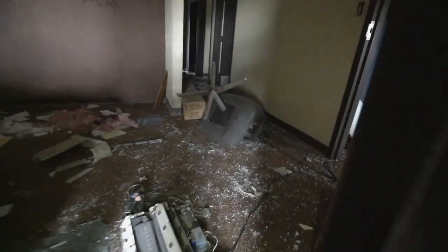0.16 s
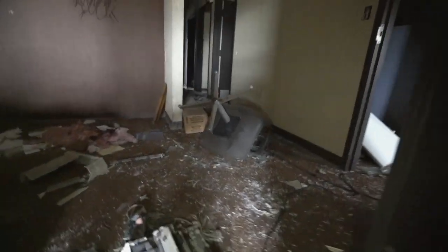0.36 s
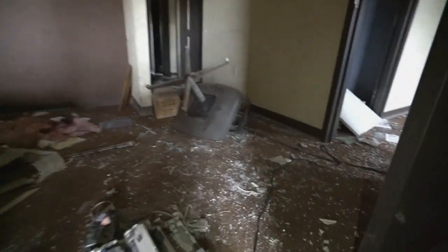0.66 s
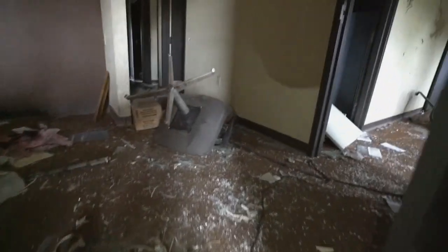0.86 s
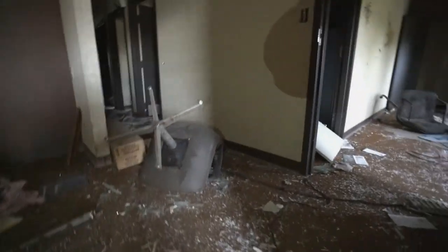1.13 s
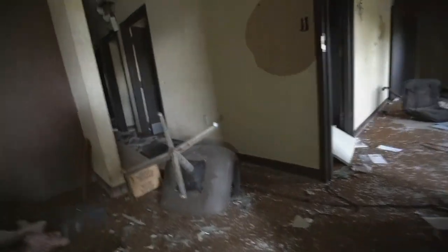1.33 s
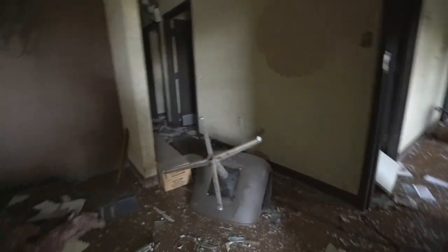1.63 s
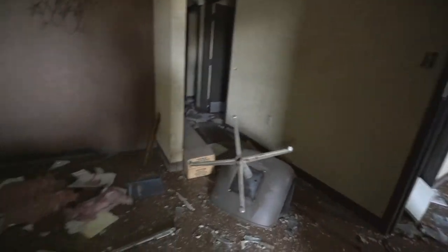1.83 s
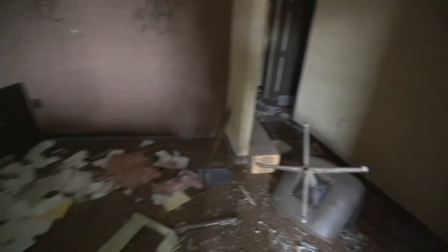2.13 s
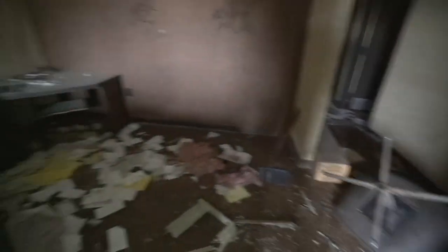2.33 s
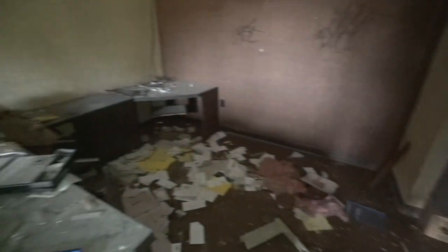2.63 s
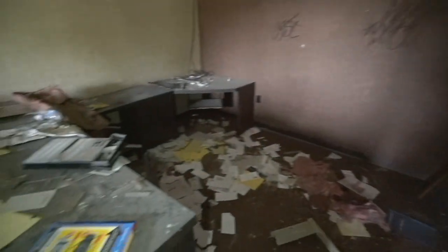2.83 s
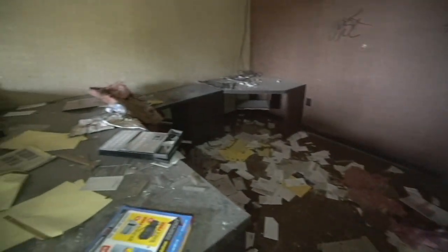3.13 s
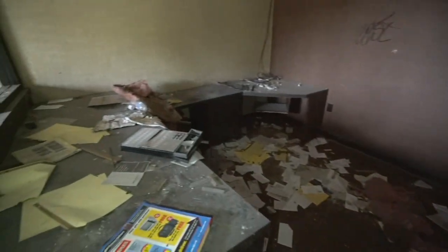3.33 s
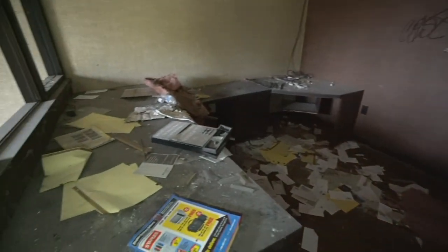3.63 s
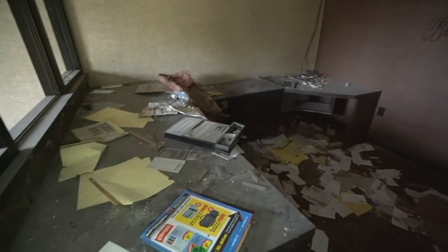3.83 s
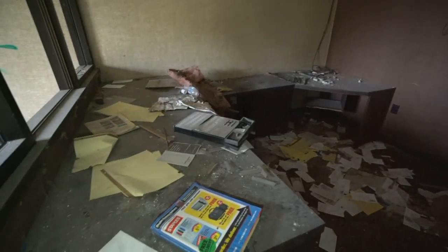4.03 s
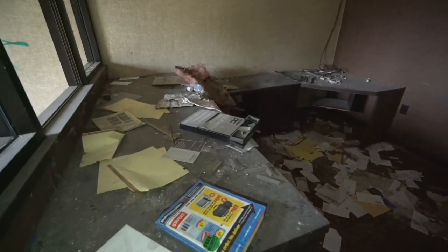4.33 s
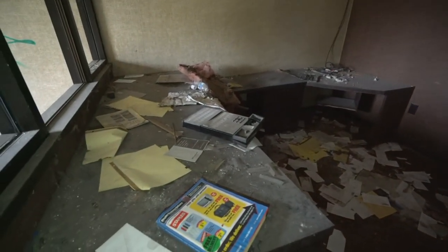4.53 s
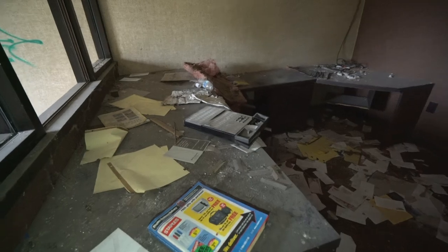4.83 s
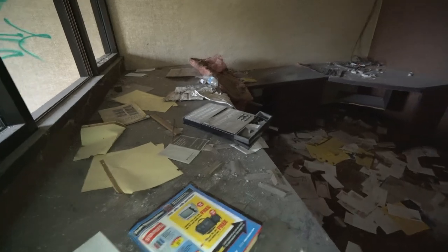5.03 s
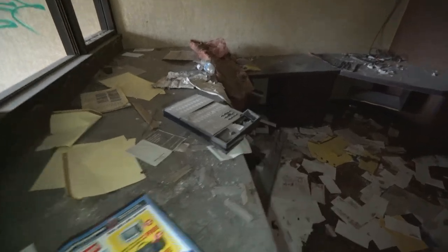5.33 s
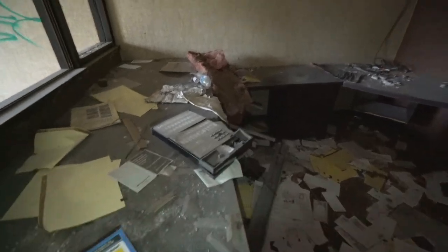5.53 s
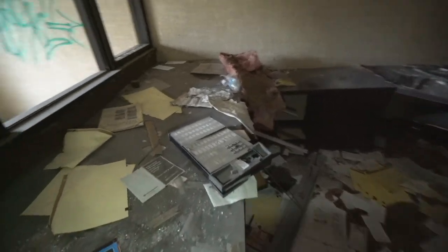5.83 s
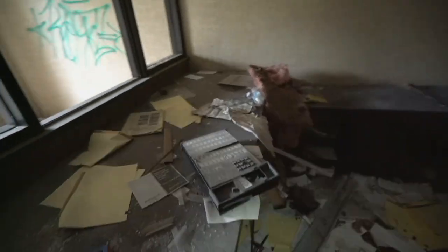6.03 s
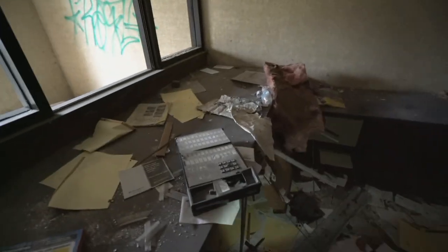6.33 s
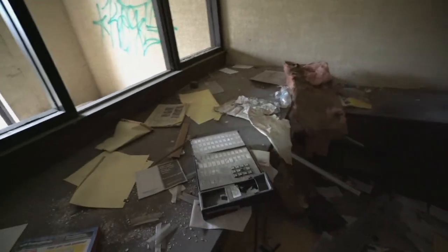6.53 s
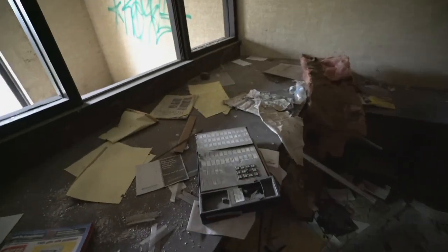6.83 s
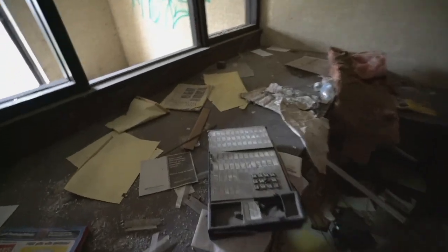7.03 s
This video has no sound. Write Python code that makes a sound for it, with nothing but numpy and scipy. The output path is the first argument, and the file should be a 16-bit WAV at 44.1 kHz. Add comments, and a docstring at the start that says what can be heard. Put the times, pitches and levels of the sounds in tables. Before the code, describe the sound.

In a small bare room, someone treads slowly over glass, each step grinding grit, cracking shards and knocking loose pieces that clink. After a pause holding a few hollow knocks, a single step crunches again, and soles slide softly on paper among tiny dry ticks near the microphone. The steps echo briefly off the walls, over a faint hush and light puffs of air on the moving microphone.

```python
"""Broken glass snaps and grinds under slow footsteps in a small bare room.
Each tread crushes grit and breaks shards; heels knock on debris, pieces clink, soles slide on paper.
After a pause with a few hollow knocks come one more crunching step, tiny close ticks and a shuffle.
Walls and ceiling throw it all back. Underneath: air on the carried microphone and the room's hush."""
import sys
import numpy as np
from scipy import signal
from scipy.fft import rfft, irfft
from scipy.io import wavfile
from scipy.ndimage import uniform_filter1d

SR = 44100
rng = np.random.default_rng(int(sys.argv[2]) if len(sys.argv) > 2 else 0)


def transcribe(u):
    """Save the signal u as a 16-bit wav file named by the first command-line argument.

    u: samples, shape (n,) or (channels, n), limited to [-1, 1]; the rate is SR.
    q: integer samples, one column per channel.
    """
    v = np.clip(np.atleast_2d(u).T, -1, 1)
    q = np.round(v * 32767).astype(np.int16)
    wavfile.write(sys.argv[1], SR, q)


N = 316638
TAPS = 2048
CLICK_HZ, CLICK_S = np.fft.rfftfreq(TAPS, 1 / SR), np.arange(TAPS) / SR
PORT_GAP_S = 0.000371  # travel time between the two microphone ports

# shard spectrum: freq_hz, density_db
SHARD_SPECTRUM = [(80, -43), (300, -7.5), (1000, -4), (2500, 3), (5500, 0.5), (8000, 1), (11000, -1.5),
                  (16000, -20.5)]
# breaking shards: start_s, level_db, body_db, sparkle_db, room_db
SNAPS = [(0.0751, -25, 2.5, -10, 3.5), (0.1734, -31.5, -9, -6.5, 4), (0.2281, -28, -13.5, -5, 4.5),
         (0.2415, -24.5, -12, -15, -15), (0.2657, -27.5, -3, -1, 3.5), (0.2802, -30.5, -2, -5.5, 7.5),
         (0.432, -42.5, -8, -14, 9), (0.6619, -40, -9, -25, 4), (0.7333, -38, -16, -32, 3.5),
         (0.836, -27, 1.5, -11, 3), (0.8869, -29.5, -8.5, -23, 3.5), (0.9373, -30.5, -12, -20, 7),
         (1.0216, -31, -1, -24, -1), (1.132, -31, -2, -17, -14), (1.1744, -28.5, -5, -11, -11),
         (1.2467, -17.5, -2.5, -18, -5), (1.2613, -30, 11, -11, -3), (1.3018, -21, -23, -24, -2.5),
         (1.3294, -27.5, 18, -8, -8), (1.4219, -16.5, 8, -0.5, 2), (1.5424, -25, -11, -11, 3.5),
         (1.5545, -27.5, -28, -5, -8), (1.6287, -33, -11.5, -5, 0.5), (1.7449, -32.5, -10, -4, -2),
         (1.8164, -36, -22, -9, -17), (1.8349, -35, -10, 1, 4), (1.8439, -29.5, -1, -8, 0),
         (1.9009, -26, -9.5, -6.5, 0), (1.9525, -25.5, -16, -8, -7), (1.982, -25, -1, -4, 2),
         (2.0022, -20, -8.5, -13.5, 4.5), (2.0165, -34, -2, 2, 7), (2.499, -36, -8, -5.5, 5.5),
         (2.6094, -36, -6, -22, 9), (2.6441, -24.5, 1.5, -34, 2), (2.7714, -24, -2, -10, 1),
         (2.7829, -25.5, -11, -10.5, -7), (3.484, -39, 2, -21, 5.5), (3.558, -44.5, -2.5, -7, 7.5),
         (3.764, -44.5, -13, -5, 1), (3.7883, -46, -11, -6, -8), (3.8615, -54, -5, -11, 12),
         (4.1858, -50.5, 0, 1, 2), (4.1967, -42, -20, 3, -5), (4.9993, -31, -3.5, -5, 4),
         (5.0464, -25, -.5, -13, 5), (5.0587, -27, -6.5, -8, 5), (5.1345, -25.5, -0.5, -7, 5),
         (5.1477, -28, -9.5, -5, 6)]


def snaps(burst_s=0.0006, splinter_s=0.0062, splinter_db=-9, strain_s=0.0019, strain_db=-15, gain_db=18):
    """A shard crackles under strain, fails in a quick burst and sheds splinters."""
    out = np.zeros((2, N))
    for start_s, level_db, body_db, sparkle_db, room_db in SNAPS:
        tilt = [(1500, body_db + 8.5), (3400, 0), (6000, 0), (9000, sparkle_db)]
        colour = click(curve(SHARD_SPECTRUM, CLICK_HZ) + curve(tilt, CLICK_HZ))
        gain = amp(level_db + gain_db)
        crack = fractures(colour, burst_s) + amp(splinter_db) * fractures(colour, splinter_s)
        add(out, start_s, gain * in_room(crack, room_db, foot_pan_db(start_s), tail_input=colour))
        strain = np.array([fractures(colour, strain_s)[::-1] for port in range(2)])  # swells to the break
        add(out, start_s - TAPS / SR + burst_s, gain * amp(strain_db) * strain)
    return out


# grit, splinter and floor spectra: freq_hz, density_db
GRIT_SPECTRUM = [(880, -29), (1500, -2.5), (2320, -9), (2830, -9), (4730, -6.5), (5830, -3), (7690, -5),
                 (11200, -14.5), (14900, -21), (16000, -42)]
SPLINTER_SPECTRUM = [(800, -17), (2200, -17), (3600, 12.5), (5600, 10.5), (7500, -3.5), (11000, -23),
                     (16000, -15)]
MURMUR_SPECTRUM = [(80, -19.5), (200, -2.5), (340, -1), (600, 0.5), (1000, -1), (1600, -2.5), (2600, 1),
                   (6000, -27)]
# sole bearing down on glass: start_s, length_s, grind_db, murmur_db
TREADS = [(-.03, .2, -50.5, -47), (.23, 0.087, -49.5, -42.5), (.42, 0.087, -55, -58),
          (.58, 0.14, -52, -51.5), (.85, 0.22, -43.5, -47.5), (.98, 0.37, -41.5, -43.5),
          (1.57, 0.36, -51, -55.5), (1.85, .2, -44.5, -49), (2.13, 0.047, -50, -53),
          (2.27, 0.05, -47.5, -49), (2.43, 0.29, -50, -49), (3.5, 0.37, -64, -64), (4.945, 0.046, -50, -51),
          (5.0, .035, -47, -53), (5.05, 0.34, -47.5, -50), (5.69, 0.035, -53.5, -62.5),
          (5.86, 0.23, -60.5, -59.5)]


def grinding(full_load_db=-51.5):
    """Fine grit is crushed, splinters crackle under load, and the floor murmurs as the weight shifts."""
    weight, shift = envelopes(TREADS, rise_share=0.034, fall_db_per_s=72.5, build_db=2)
    load = np.minimum(weight / amp(full_load_db), 1) ** 2
    grit = weight * grains(GRIT_SPECTRUM, per_s=1300, spread_db=6.5, room_db=1.5)
    crackle = weight * load * grains(SPLINTER_SPECTRUM, per_s=260, spread_db=4.5, room_db=-6)
    murmur = shift * grains(MURMUR_SPECTRUM, per_s=800, spread_db=2.5, room_db=5.5)
    return grit + amp(-1.5) * crackle + amp(-2.5) * murmur


# litter clack spectrum: freq_hz, density_db
LITTER_SPECTRUM = [(150, -45), (450, -7.5), (760, 7), (930, 5), (1100, 1.5), (1500, -1.5), (2000, -3),
                   (2700, -8), (5000, -12), (12000, -25)]
# thud spectrum: pitch_ratio, density_db
THUD_SPECTRUM = [(.1, -54), (.3, -39), (.6, -8), (1, 6), (1.5, -9), (2.1, -8), (3.2, -29), (7, -40),
                 (20, -80)]
# heels and debris hitting the floor: start_s, level_db, pitch_hz, clack_db
KNOCKS = [(0.075, -21, 293, -13.5), (0.177, -33, 281, -22), (1.245, -29.5, 580, 1.5),
          (1.345, -28.5, 315, -14), (1.421, -16, 340, -33), (2.771, -12.5, 343, -12.5),
          (2.786, -32.5, 378, 8), (3.125, -28, 294, -9.5), (3.231, -37, 550, -5.5), (3.247, -32.5, 550, -9),
          (3.263, -30, 520, -8.5), (3.295, -27.5, 372, -11.5), (3.311, -39, 510, 0.5), (3.48, -29, 530, -7),
          (3.562, -43.5, 500, -3.5), (4.392, -54, 573, -10), (6.005, -42, 637, -20), (6.985, -33, 350, -17)]


def knocks(contact_s=0.0016, sink_s=0.00354, hollow_db=-11.5, hollow_t60_s=0.041, room_db=-6, gain_db=20):
    """Rough contact clacks on litter, the weight sinks in with a thud, the struck piece hums briefly."""
    out = np.zeros((2, N))
    litter = click(curve(LITTER_SPECTRUM, CLICK_HZ))
    pitch_ratio, density_db = np.transpose(THUD_SPECTRUM)
    for start_s, level_db, pitch_hz, clack_db in KNOCKS:
        gain = amp(level_db + gain_db)
        spectrum = amp(curve(np.c_[pitch_hz * pitch_ratio, density_db], CLICK_HZ))
        pulse = np.fft.fftshift(irfft(1j * spectrum))  # a push, then a pull
        thud = in_room(pulse / np.linalg.norm(pulse), room_db, pan_db=2, lag_s=0.000073)
        add(out, start_s + sink_s - TAPS / 2 / SR, gain * thud)
        hollow = ring([(pitch_hz, hollow_db, hollow_t60_s)], size=4096)
        add(out, start_s + sink_s, amp(level_db) * in_room(hollow, room_db, lag_s=0.0001))
        clack = in_room(fractures(litter, contact_s), room_db=2.5, tail_input=litter)
        add(out, start_s, gain * amp(clack_db) * clack)
    return out


# scrape, hiss and rub spectra: freq_hz, density_db
SCRAPE_SPECTRUM = [(300, -15), (450, -5.5), (600, -7.5), (780, -2.5), (1020, -1), (1260, -0.5), (1500, -2),
                   (1850, -4.5), (2200, -1.5), (2800, -29), (4500, -11), (9000, -33)]
HISS_SPECTRUM = [(1500, -5.5), (2800, 3.5), (5000, -2), (8000, -3), (12000, -10.5), (16000, -20)]
RUB_SPECTRUM = [(90, -16), (200, -11.5), (340, -2), (500, -5.5), (800, -12.5), (2000, -45)]
# sole sliding on paper and dust: start_s, length_s, scrape_db, hiss_db, rub_db
SLIDES = [(-.01, 0.014, -43.5, -41, -45), (2.35, 0.048, -51.5, -68, -50.5), (2.51, 0.1, -50.5, -46.5, -48),
          (2.635, 0.017, -43, -44, -43.5), (5.17, 0.076, -45.5, -45.5, -51.5),
          (5.3, 0.068, -44.5, -41, -57), (5.41, 0.065, -60, -64, -61), (5.555, 0.076, -58.5, -51.5, -68),
          (5.96, 0.12, -56.5, -57, -62.5), (6.07, 0.17, -64, -62, -62.5), (6.15, 0.098, -48.5, -50.5, -59),
          (6.92, 0.11, -49, -49.5, -54.5), (6.975, 0.038, -49, -45, -45), (7.0, 0.16, -54, -53.5, -53)]


def scuffing(slip_rms_db=1.5):
    """A sole catches and slips on paper: a jerky scrape, hiss above, a soft rub below."""
    scrape_gain, hiss_gain, rub_gain = envelopes(SLIDES, rise_share=0.24, fall_db_per_s=250, build_db=1.5)
    slip_db = slip_rms_db * unit_rms(uniform_filter1d(rng.standard_normal(N), size=400))
    scrape = scrape_gain * grains(SCRAPE_SPECTRUM, per_s=700, spread_db=2, room_db=0.5)
    hiss = hiss_gain * grains(HISS_SPECTRUM, per_s=2800, spread_db=14, room_db=11)
    rub = rub_gain * grains(RUB_SPECTRUM, per_s=700, spread_db=4, room_db=2.5)
    return amp(slip_db + 1) * scrape + amp(-0.5) * hiss + amp(slip_db / 2 - 0.5) * rub


# modes of a loose piece: pitch_ratio, level_db, t60_cycles
PIECE_MODES = [(1.001, 1.5, 48), (1.08, -14, 21), (1.27, -9, 40), (2.66, -32, 70)]
# clinking pieces: start_s, level_db, pitch_hz
CLINKS = [(0.075, -28.5, 1085), (0.733, -32.5, 3080), (0.972, -25, 1130), (1.423, -24, 3510),
          (1.437, -44, 1520), (2.658, -23, 3070), (2.786, -26, 1950), (5.048, -28, 2267),
          (5.061, -30.5, 1605), (5.232, -37, 1114), (5.393, -38.5, 1184), (5.977, -46, 1060),
          (6.986, -36.5, 1003), (7.024, -39, 1030)]


def clinks():
    """Loose pieces ring as they are pressed down."""
    out = np.zeros((2, N))
    for start_s, level_db, pitch_hz in CLINKS:
        modes = [(pitch_hz * ratio, db, cycles / pitch_hz / ratio) for ratio, db, cycles in PIECE_MODES]
        add(out, start_s, amp(level_db) * in_room(ring(modes, size=4096), room_db=0.5, lag_s=0.0001))
    return out


# small metal modes: freq_hz, level_db, t60_s
METAL_MODES = [(10210, -19, .1), (10600, -6, 0.15), (11940, -7, 0.21), (11070, 5.5, 0.21),
               (11400, -12, .14), (11370, -9, .12), (11800, -13, .1), (13330, -10, 0.088)]
# jingles: start_s, level_db
JINGLES = [(1.422, -38.5), (2.774, -52)]


def jingles():
    """Small metal rings at the heaviest steps."""
    out = np.zeros((2, N))
    for start_s, level_db in JINGLES:
        metal = ring(METAL_MODES, size=12000)
        add(out, start_s, amp(level_db) * in_room(metal, room_db=-28.5, lag_s=0.00001))
    return out


# tick modes: freq_hz, level_db, t60_s
TICK_MODES = [(5040, -3.5, 0.0048), (6050, 6, 0.0023), (6640, 1.5, 0.005), (10300, -12, 0.005),
              (12920, -13, .003)]
# close ticks: start_s, level_db
TICKS = [(5.441, -31), (5.4485, -20), (5.4524, -20.5), (5.5365, -35), (5.5405, -25.5), (5.661, -24),
         (5.9113, -29)]


def ticks(rise_s=0.00022):
    """Tiny dry ticks beside the microphone ring for a few milliseconds."""
    out = np.zeros((2, N))
    attack = (1 - np.exp(-CLICK_S / rise_s)) ** 2
    for start_s, level_db in TICKS:
        tick = amp(level_db) * attack * ring(TICK_MODES, detune=0.036)
        add(out, start_s - PORT_GAP_S, in_room(tick, room_db=-36, pan_db=7, lag_s=0.00004))
    return out


# wind spectrum: freq_hz, density_db
WIND_SPECTRUM = [(15, -8.5), (40, -4.5), (70, 4), (110, -1), (180, -6.5), (400, -32)]
# puffs of air: start_s, length_s, level_db
GUSTS = [(.05, 0.035, -44.5), (1.04, 0.21, -41.5), (1.3, 0.14, -51), (1.51, 0.014, -45.5),
         (3.26, 0.039, -56), (6.23, 0.021, -58)]


def wind(draught_db=-60.5, ease_db_per_s=0.37, eddy_db=-16, gain_db=-3.5):
    """Air buffets the moving microphone and eddies between its ports; the draught slowly eases."""
    buffet = steady_noise(WIND_SPECTRUM)
    eddies = amp(eddy_db) * steady_noise(WIND_SPECTRUM) * np.array([[1], [-1]])
    draught = amp(draught_db - ease_db_per_s * np.arange(N) / SR)
    gusts = envelopes(GUSTS, rise_share=0.23, fall_db_per_s=151)[0]
    return amp(gain_db) * (draught + gusts) * (buffet + eddies)


# still room spectrum: freq_hz, density_db
HUSH_SPECTRUM = [(59, -40), (100, -6.5), (147, -5), (239, -7), (271, -5), (308, -6.5), (492, -5.5),
                 (676, -8.5), (836, -10), (1360, -10.5), (4770, -17.5), (8110, -18.5), (16000, -27.5)]


def hush(level_db=-61):
    """The empty building's steady, diffuse noise."""
    return amp(level_db) * steady_noise(HUSH_SPECTRUM)


# room decay: freq_hz, t60_s
ROOM_DECAY = [(150, 0.38), (400, 0.26), (1200, 0.25), (4000, 0.25), (9000, 0.24), (16000, 0.37)]
# wall and ceiling echoes: nominal_delay_s, gain
ECHOES = [(.0068, 0.14), (0.0103, 0.21), (0.0167, 0.32), (0.024, 0.095)]


def in_room(x, room_db, pan_db=0, lag_s=0.00023, tail_input=None, size=16384, build_s=0.00073):
    """Direct path, echoes and tail, drawn anew per spot; tail_input is what radiates sideways."""
    hz, t, spectra = signal.stft(diffuse_noise(size), SR, nperseg=256)
    decay = amp(-60 * t / curve(ROOM_DECAY, hz)[:, None])
    tail = signal.istft(spectra * decay, SR, nperseg=256)[1][:, :size]
    tail *= 1 - np.exp(-np.arange(size) / SR / build_s)
    tail /= np.linalg.norm(tail[0])
    paths = arrival(PORT_GAP_S, lag_s * rng.uniform(0.27, 1.1), size) * amp([[pan_db / 2], [-pan_db / 2]])
    for nominal_delay_s, gain in ECHOES:
        delay_s = nominal_delay_s * rng.uniform(0.94, 0.96)
        paths += amp(room_db) * gain * arrival(delay_s, PORT_GAP_S * rng.uniform(-0.48, 0.46), size)
    tail_input = x if tail_input is None else tail_input
    reverb = amp(room_db) * signal.oaconvolve(tail_input[None], tail, axes=1)
    return signal.oaconvolve(x[None], paths, axes=1) + reverb


def arrival(delay_s, lag_s, size):
    """One path to both ports; the right hears it lag_s later."""
    n = np.arange(size)
    return np.array([np.sinc(n - delay_s * SR), np.sinc(n - (delay_s + lag_s) * SR)])


# side of the working foot: time_s, pan_db
FOOT_PAN = [(.2, 0.5), (.85, 4), (2.0, 4.5), (2.6, -4), (3.3, -9), (5.1, -4), (6.2, 0), (7.0, -12)]


def foot_pan_db(time_s):
    """Left-over-right level of the working foot."""
    return np.interp(time_s, *np.transpose(FOOT_PAN))


def fractures(colour, decay_s):
    """Dying burst of micro-clicks of one colour, energy 1."""
    noise = rng.standard_normal(TAPS)
    spikes = noise * np.sqrt(abs(noise))
    burst = signal.fftconvolve(spikes * CLICK_S * np.exp(-CLICK_S / decay_s), colour)[:TAPS]
    return burst / np.linalg.norm(burst)


def grains(spectrum, per_s, spread_db, room_db, spots=3):
    """Small fractures of unequal size at a few spots under the sole, rms 1."""
    out = np.zeros((2, N))
    colour = click(curve(spectrum, CLICK_HZ))
    for _ in range(spots):
        sizes = amp(spread_db * np.minimum(rng.exponential(1, N), 4)) * rng.choice([-1, 1], N)
        impulses = sizes * (rng.random(N) < per_s / spots / SR)
        out += in_room(signal.oaconvolve(impulses, colour), room_db)[:, :N]
    return unit_rms(out)


def envelopes(rows, rise_share, fall_db_per_s, build_db=0):
    """One gain curve per level column: each event rises, builds while it lasts, then dies away."""
    t = np.arange(N) / SR
    gains = np.zeros((len(rows[0]) - 2, N))
    for start_s, length_s, *levels_db in rows:
        age_s = t - start_s
        attack = np.clip(age_s / (rise_share * length_s), 0, 1)
        swell_db = build_db * (np.clip(age_s / length_s, 0, 1) - 0.5)
        fall_db = fall_db_per_s * np.clip(age_s - length_s, 0, 1)
        gains = np.maximum(gains, np.outer(amp(levels_db), attack * amp(swell_db - fall_db)))
    return gains


def click(spectrum_db):
    """Minimum-phase click, energy 1, from a spectrum on CLICK_HZ."""
    log_gain = np.log(amp(np.r_[spectrum_db, spectrum_db[-2:0:-1]]))
    wave = np.fft.ifft(np.exp(np.conj(signal.hilbert(log_gain)))).real
    return wave / np.linalg.norm(wave)


def ring(modes, size=TAPS, detune=0):
    """Dying modes of a struck object."""
    t = np.arange(size) / SR
    out = np.zeros(size)
    for freq_hz, level_db, t60_s in modes:
        freq_hz *= 1 + detune * rng.uniform(-1, 1)
        out += amp(level_db - 60 * t / t60_s) * np.sin(2 * np.pi * freq_hz * t)
    return out


def diffuse_noise(size):
    """Noise from all sides, alike at both ports in the bass only."""
    left, other = rfft(rng.standard_normal((2, size)))
    coherence = np.sinc(2 * PORT_GAP_S * np.fft.rfftfreq(size, 1 / SR))
    right = coherence * left + np.sqrt(1 - coherence ** 2) * other
    return irfft(np.array([left, right]), size)


def steady_noise(spectrum):
    """Coloured diffuse noise, rms 1."""
    gain = amp(curve(spectrum, np.fft.rfftfreq(N, 1 / SR)))
    return unit_rms(irfft(rfft(diffuse_noise(N)) * gain, N))


def curve(points, hz):
    """Interpolates a table over log frequency."""
    freq_hz, value = np.transpose(points)
    return np.interp(np.log(hz + 1), np.log(freq_hz), value)


def amp(db):
    """Decibels to gain."""
    return 10 ** (np.asarray(db) / 20)


def unit_rms(x):
    """Scales to rms 1."""
    return x / np.sqrt(np.mean(x ** 2) + 1e-20)


def add(mix, start_s, sound):
    """Mixes in a stereo sound."""
    part = mix[:, max(round(start_s * SR), 0):][:, :sound.shape[1]]
    part += sound[:, :part.shape[1]]


def scene(pan_share=0.2):
    """All sources; the room evens out most of the soles' lean to one side."""
    pan_db = pan_share * foot_pan_db(np.arange(N) / SR)
    soles = (grinding() + scuffing()) * amp([pan_db / 2, -pan_db / 2])
    return snaps() + soles + knocks() + clinks() + jingles() + ticks() + wind() + hush()


def record(dry):
    """Steep low-pass at 16150 Hz."""
    lowpass = signal.firwin(511, 16150, window=("kaiser", 9), fs=SR)
    return signal.oaconvolve(dry, lowpass[None], "same", axes=1)


dry = scene()
out = record(dry)
transcribe(out)
```